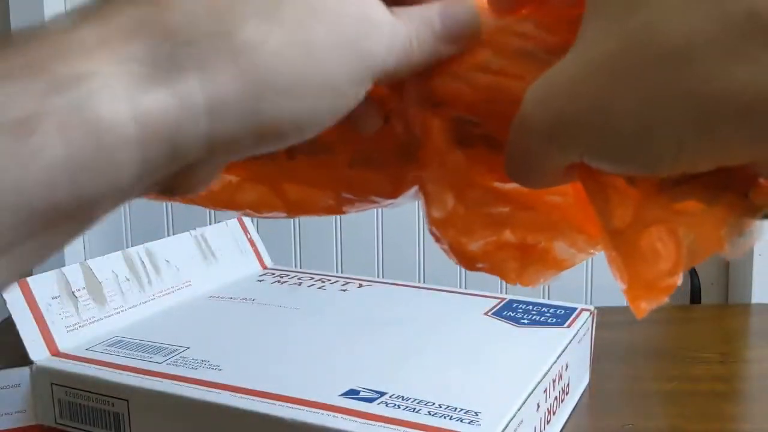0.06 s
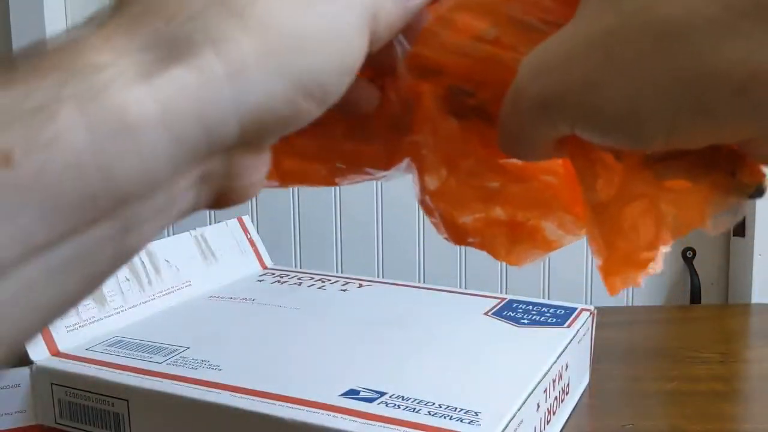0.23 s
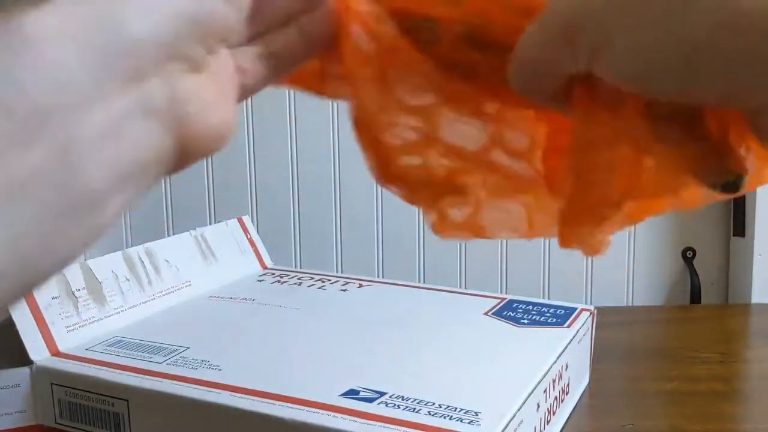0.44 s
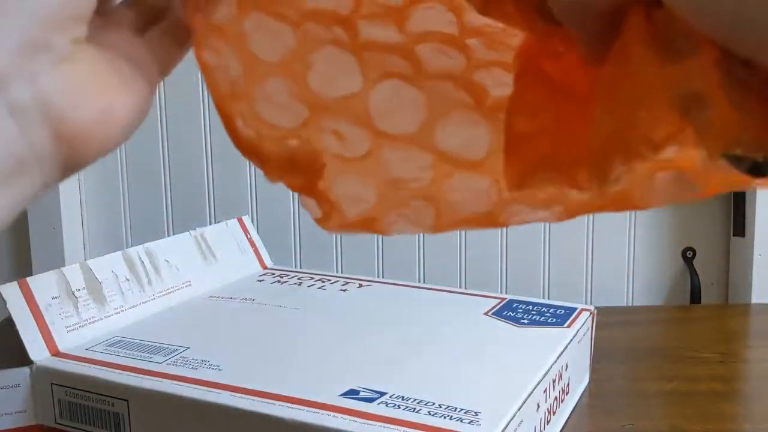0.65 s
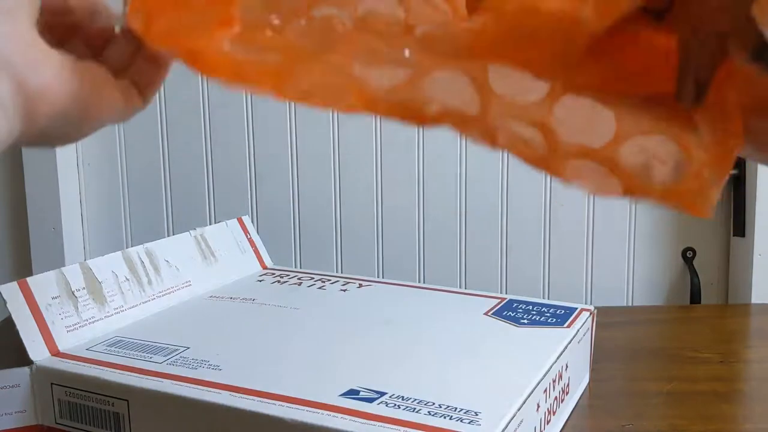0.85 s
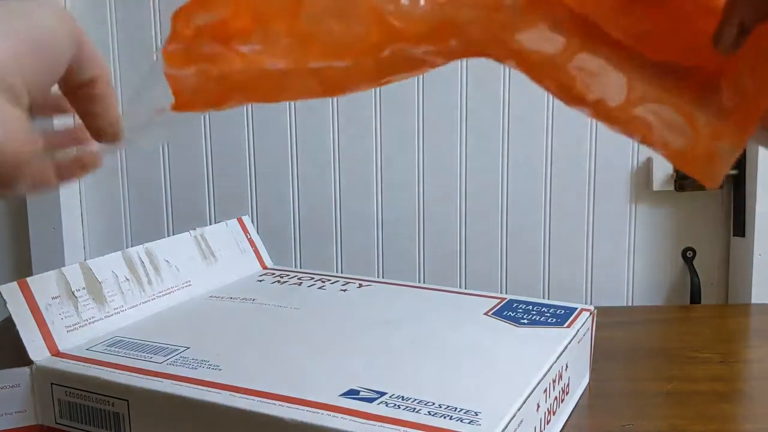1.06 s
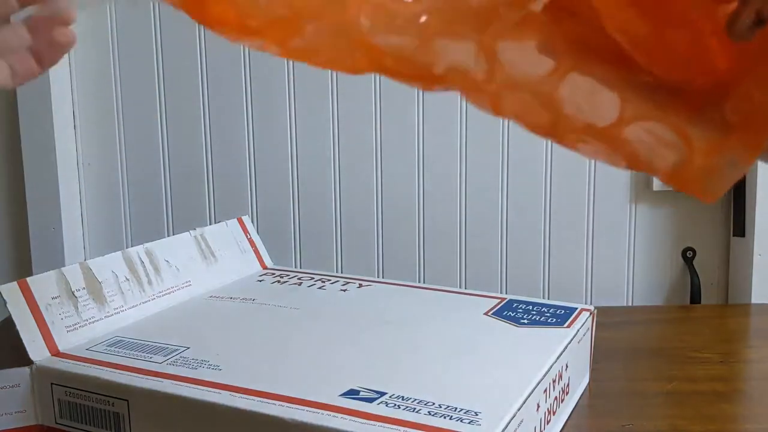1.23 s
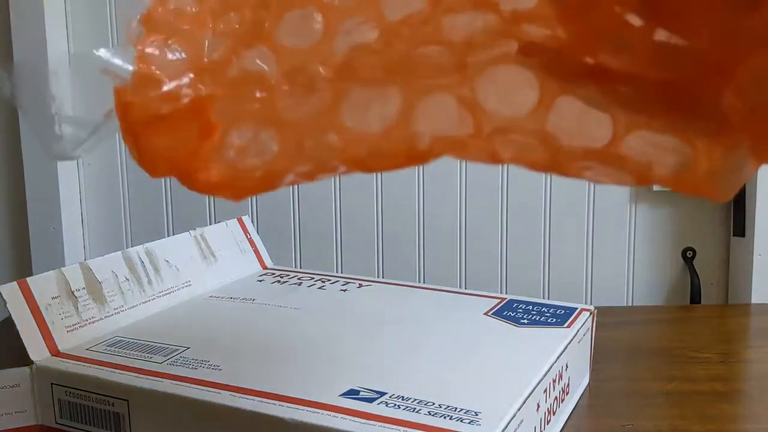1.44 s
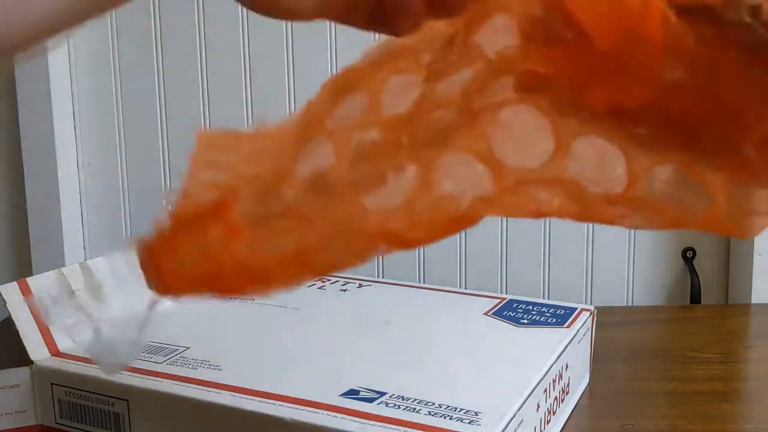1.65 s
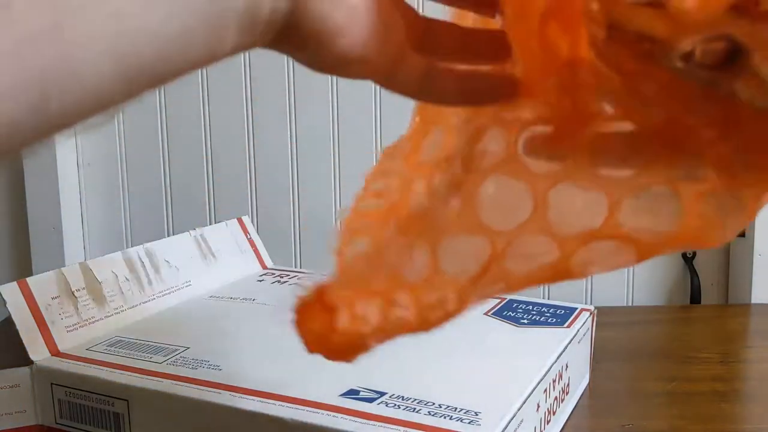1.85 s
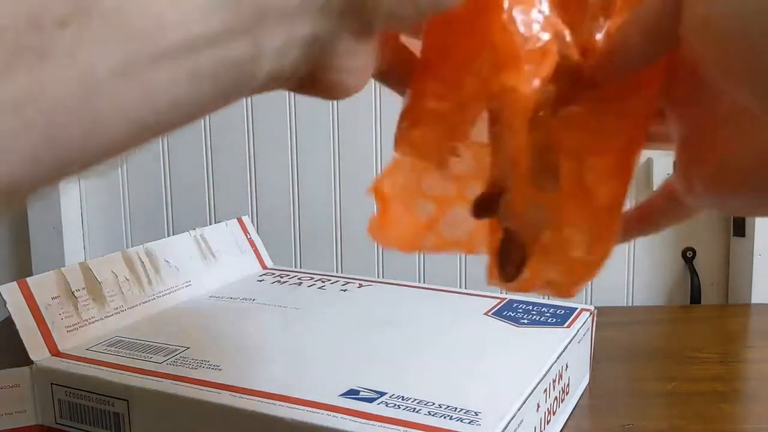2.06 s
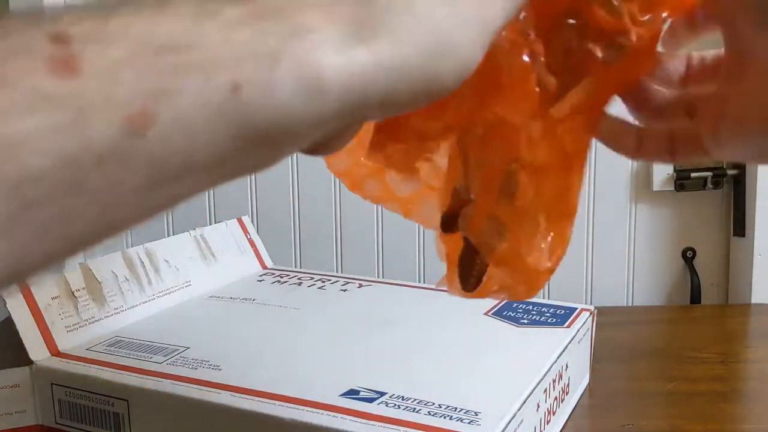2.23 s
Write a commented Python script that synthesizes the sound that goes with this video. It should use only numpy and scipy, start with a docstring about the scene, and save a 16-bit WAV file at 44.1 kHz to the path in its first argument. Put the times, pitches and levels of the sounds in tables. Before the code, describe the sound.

Bubble wrap being handled: bright snaps, a dense crinkling tug, then loose rustling and light taps

```python
"""Bubble wrap snaps as hands grip it, drags free in one dense, bright crackle, then rustles as it is lifted.
Fingers tap and rub the air cells and the loose sheet flaps now and then, close up in a small room.
Snaps, creases, taps and crackles are buckling facets: noise bursts with a spike, scattered and coloured.
Flaps are damped sines; all the handling has a decaying noise tail as its room, over quiet noise."""
import sys
import numpy as np
from scipy import signal
from scipy.fft import rfft, irfft, next_fast_len
from scipy.io import wavfile
from scipy.ndimage import map_coordinates

SR = 44100
rng = np.random.default_rng(int(sys.argv[2]) if len(sys.argv) > 2 else 0)


def digitize_waveform(pressure):
    """Quantize a signal to 16-bit integers and store it at the path in sys.argv[1].

    Rows of a 2-D input are taken as channels; values are limited to [-1, 1].
    """
    field = np.atleast_2d(pressure).T
    bounded = np.clip(field, -1, 1)
    quanta = np.round(bounded * 32767).astype(np.int16)
    wavfile.write(sys.argv[1], SR, quanta)


N = 101429

ONSET_S = .002  # a flip's swell runs this long before its sharpest crack
HALVES = np.array([[.5], [-.5]])  # splits a left-right difference between the ports

# spectrum of taut film: (frequency [Hz], level [dB])
TAUT_FILM_COLOUR = [(100, -22.5), (300, -16.5), (900, -3), (1700, 0), (3200, -1), (4500, -2), (6000, 1),
                    (7400, -3.5), (10500, 2), (13000, -1.5), (16000, -3.5)]
# spectrum of an air cell pitched at 840 Hz: (frequency [Hz], level [dB])
AIR_CELL_COLOUR = [(80, -23.5), (520, -6.5), (840, 2), (1100, -1), (1700, -5.5), (2600, -10), (9000, -35)]


def amp(db):
    """Decibels to gain."""
    return 10 ** (np.asarray(db) / 20)


def unit(x):
    """Scaled to rms 1."""
    return x / np.sqrt(np.mean(x ** 2) + 1e-20)


def along(points, hz):
    """(Hz, value) points interpolated on a log frequency axis."""
    f, v = np.transpose(points)
    return np.interp(np.log(hz + 1), np.log(f + 1), v)


def curve(rows):
    """One value per sample from (s, value) rows."""
    return np.interp(np.arange(N) / SR, *np.transpose(rows))


def filtered(x, response):
    """x times a response of frequency, zero phase."""
    size = next_fast_len(N + SR // 2)
    hz = np.fft.rfftfreq(size, 1 / SR)
    return irfft(rfft(x, size) * response(hz), size)[..., :N]


def coloured(x, points, size=4096):
    """x through a minimum-phase filter of unit energy, made by folding the cepstrum."""
    hz = np.fft.rfftfreq(size, 1 / SR)
    cepstrum = irfft(np.log(amp(along(points, hz))))
    cepstrum[1:size // 2] *= 2
    cepstrum[size // 2 + 1:] = 0
    impulse = irfft(np.exp(rfft(cepstrum)))
    return signal.fftconvolve(x, impulse[None] / np.linalg.norm(impulse), axes=1)[:, :N]


def struck(sound, colour):
    """A single flip given its colour; energy 1 per port on average."""
    x = coloured(sound, colour)
    return unit(x) / np.sqrt(x.shape[1])


def add(track, s, sound):
    """Mix a sound in at time s."""
    i = max(0, round(s * SR))
    part = track[:, i:i + sound.shape[1]]
    part += sound[:, :part.shape[1]]


def buckle(decay_s, spike, scatter, lead_ms, uneven_db, size=1024):
    """One facet of film flips: swell, spike and brief ring with random resonances, scattered by folds."""
    swell_s, lead_jitter_ms = .00048, .053
    t = np.arange(size) / SR - ONSET_S
    hz = np.fft.rfftfreq(size, 1 / SR)
    shape = np.exp(np.minimum(t / swell_s, -t / decay_s))
    ring = unit(rng.standard_normal(size) * shape)
    crack = rng.choice([-1, 1]) * unit(1. * (shape == shape.max()))
    direct = unit(ring + spike * crack)

    # independent per port, twice as long, stronger with frequency
    fold_shape = np.exp(np.minimum(t / swell_s, -t / (2 * decay_s)))
    folds = unit(rng.standard_normal((2, size)) * fold_shape)
    spread = scatter * hz / (hz + 700)

    bumps = map_coordinates(rng.standard_normal(size // 16), [np.sqrt(hz / 45)])
    resonances = amp(uneven_db * bumps)
    lead_s = (lead_ms + rng.normal(0, lead_jitter_ms)) / 1000  # positive: left first
    delay = np.exp(2j * np.pi * hz * HALVES * lead_s)
    spectrum = (rfft(direct) + spread * rfft(folds)) * resonances * delay
    return unit(irfft(spectrum)) / np.sqrt(size)


def crackle(rate, spread_db, decay_s, scatter, uneven_db, count=20):
    """Facets of count kinds flip at random moments, rate a second in all; rms 1."""
    out = np.zeros((2, N))
    for _ in range(count):
        sizes = amp(spread_db * np.clip(rng.standard_normal(N), -2, 2))
        signs = np.sign(rng.standard_normal(N))
        flips = sizes * signs * (rng.random(N) < rate / count / SR)
        facet = buckle(decay_s, spike=.82, scatter=scatter, lead_ms=.016, uneven_db=uneven_db)
        out += signal.oaconvolve(flips[None], facet, axes=1)[:, :N]
    return unit(out)


def room(x, wet_db):
    """Adds the answer of table and panelled walls: a noise tail with its own decay in each band."""
    # decay by 60 dB: (frequency [Hz], time [s])
    t60_s = [(500, 0.2), (4000, 0.19), (16000, 0.088)]
    # left-right correlation of the tail: (frequency [Hz], correlation [-1..1])
    likeness = [(300, 0.67), (700, 0.42), (1500, -0.25), (4000, -0.013)]
    hz, t, z = signal.stft(rng.standard_normal((2, SR // 2)), SR, nperseg=256)
    decay = amp(-60 * t / along(t60_s, hz)[:, None])
    onset = 1 - np.exp(-t / .00043)
    # mid-side balance sets the correlation
    turn = np.arccos(np.clip(along(likeness, hz), -1, 1))[:, None] / 2
    z = z * decay * onset * [np.cos(turn), np.sin(turn)]
    mid, side = signal.istft(z, SR, nperseg=256)[1]
    tail = np.array([mid + side, mid - side])
    return x + amp(wet_db) * signal.fftconvolve(x, tail / np.linalg.norm(tail[0]), axes=1)[:, :N]


def floor():
    """Quiet rumble and hiss of the room: coloured noise, partly shared by the ports."""
    # (frequency [Hz], level [dB])
    floor_colour = [(30, -7.5), (100, -16.5), (300, -27), (2000, -20), (16000, -23.5)]
    noise = rng.standard_normal(N) + rng.standard_normal((2, N))
    return amp(-54) * unit(coloured(noise, floor_colour))


def rustle(count=2):
    """Soft crinkling from several patches of the loose sheet, now brighter, now duller."""
    # slack sheet being moved: (time [s], level [dB])
    motion = [(0, -47), (.14, -88), (.3, -61), (.66, -33), (.73, -41.5), (.8, -50.5), (.88, -50.5),
              (.94, -39.5), (1.02, -44), (1.06, -38), (1.095, -54), (1.17, -48), (1.27, -52.5), (1.33, -45),
              (1.38, -38), (1.49, -41.5), (1.55, -40.5), (1.63, -41.5), (1.72, -55), (1.755, -44),
              (1.83, -40), (1.925, -48.5), (1.965, -39.5), (1.99, -45.5), (2.08, -38.5), (2.17, -38),
              (2.23, -43.5), (2.3, -38.5)]
    # treble gain: (time [s], gain [dB])
    treble_gain = [(.8, 2), (1.0, 1.5), (1.13, 11.5), (1.38, 4.5), (1.77, 0.5), (1.9, 5), (2.3, -2)]
    # (frequency [Hz], level [dB])
    rustle_colour = [(60, -10.5), (220, -9.5), (450, -3), (850, 0.5), (1800, 3), (4200, 1.5), (5500, -3),
                     (7400, -6.5), (9500, -2.5), (12000, -3), (16000, -8)]
    treble_hz = 6000
    out = np.zeros((2, N))
    for _ in range(count):
        grains = crackle(rate=620, spread_db=5.5, decay_s=.0006, scatter=.5, uneven_db=3)
        grains *= amp(curve(motion))
        treble = filtered(grains, lambda hz: hz ** 2 / (hz ** 2 + treble_hz ** 2))
        shaded = grains + (amp(curve(treble_gain)) - 1) * treble
        out += room(coloured(shaded, rustle_colour), wet_db=-2.5)
    return out / np.sqrt(count)


def rubs():
    """Stick and slip of a finger drums softly on the air cells."""
    # strokes: (middle [s], length between 1/e points [s], level [dB])
    rub_strokes = [(0.015, 0.11, -39), (0.197, 0.053, -44)]
    t = np.arange(N) / SR
    strokes = sum(amp(db) * np.exp(-(2 * (t - s) / length) ** 4) for s, length, db in rub_strokes)
    grains = crackle(rate=700, spread_db=2, decay_s=.0034, scatter=1, uneven_db=2)
    return room(coloured(grains * strokes, AIR_CELL_COLOUR), wet_db=-8)


def taps():
    """Hollow pats of fingers on the air cells: the cell spectrum shifts to each pitch."""
    # (time [s], relative level [dB], pitch [Hz])
    tap_events = [(.0225, -33, 940), (0.0758, -31, 960), (.394, -27, 830), (.7145, -28.5, 704),
                  (1.048, -29, 700), (1.162, -34, 1400), (1.44, -29.5, 990), (1.799, -36, 845),
                  (1.954, -33.5, 427), (2.039, -31, 880), (2.048, -30, 820), (2.148, -37.5, 990)]
    gain_db, cell_hz = 19, 840
    out = np.zeros((2, N))
    for s, db, hz in tap_events:
        pat = buckle(decay_s=.003, spike=1.3, scatter=.6, lead_ms=.06, uneven_db=1.2)
        colour = [(f * hz / cell_hz, level) for f, level in AIR_CELL_COLOUR]
        add(out, s - ONSET_S, amp(gain_db + db) * struck(pat, colour))
    return room(out, wet_db=-9.5)


def snaps():
    """Taut film cracks as the grip tightens: single bright flips."""
    # (time [s], relative level [dB], left-right difference [dB])
    snap_events = [(.025, -29.5, 9), (0.078, -23, -0.5), (0.1128, -30, -4), (.179, -28, 2),
                   (0.2164, -17.5, 17), (0.2191, -8.5, -3), (0.2244, -9.5, 0), (0.2319, -17.5, -2),
                   (0.2617, -11.5, 4), (0.284, -15.5, -3.5), (0.3204, -22, 0.5), (0.368, -13.5, 0.5),
                   (0.3936, -9.5, 3.5), (0.4139, -10.5, -4), (0.4203, -9, 9.5), (0.447, -11.5, -1),
                   (0.482, -22, -9), (0.4843, -9, -0.5), (0.4928, -16.5, 12), (0.5248, -17, 14),
                   (0.566, -14, 6), (1.9056, -26, 5)]
    gain_db = 14.5
    out = np.zeros((2, N))
    for s, db, pan_db in snap_events:
        crack = buckle(decay_s=.0009, spike=.5, scatter=.7, lead_ms=.13, uneven_db=1.8)
        port_gain = amp(gain_db + db + HALVES * pan_db)
        add(out, s - ONSET_S, port_gain * struck(crack, TAUT_FILM_COLOUR))
    return room(out, wet_db=-6)


def grip():
    """Film crinkles between tightening fingers: fine bright crackle between the snaps."""
    # (time [s], level [dB])
    grip_level = [(.06, -54), (.078, -46), (.1, -78), (.207, -57), (.222, -25), (.25, -52), (.36, -71),
                  (.385, -35.5), (.42, -24.5), (.472, -30.5), (.5, -22), (.6, -49)]
    grains = crackle(rate=1600, spread_db=5, decay_s=.00096, scatter=.48, uneven_db=1.5)
    return room(coloured(grains * amp(curve(grip_level)), TAUT_FILM_COLOUR), wet_db=-10.5)


def flaps():
    """The sheet pushes the air: one heavily damped low swing each."""
    # (time [s], level [dB], pitch [Hz])
    flap_events = [(0.397, -30.5, 62.5), (0.504, -35, 80), (0.6, -36, 100), (1.058, -35.5, 234),
                   (1.799, -34.5, 192), (1.953, -33, 92), (1.955, -25, 350), (2.147, -27, 230)]
    attack_s, decay_cycles = .0007, .34
    skew_rad_hz = 35  # over pitch: phase of each port; slow swings arrive more out of step
    out = np.zeros((2, N))
    t = np.arange(SR // 8) / SR
    for s, db, hz in flap_events:
        phase = np.array([[1], [-1]]) * skew_rad_hz / hz
        swing = np.sin(2 * np.pi * hz * t + phase)
        envelope = np.exp(-t * hz / decay_cycles) * (1 - np.exp(-t / attack_s))
        add(out, s, amp(db) * swing * envelope)
    return room(out, wet_db=-19)


def pull():
    """Film sticks and slips off the object over a fine crackle of folds; faster slips are smaller."""
    # taut film dragged off: (time [s], level [dB])
    drag = [(.45, -49), (.497, -28), (.595, -18.5), (.638, -21), (.652, -34), (.7, -46), (.83, -82)]
    # (time [s], slips per second [1/s])
    slip_rate = [(.51, 187), (.61, 520)]
    # (frequency [Hz], level [dB])
    pull_colour = [(60, -12.5), (200, -15), (450, -2), (800, -1.5), (1300, 6), (2000, 1.5), (2600, 0.5),
                   (5600, 3), (7200, -1.5), (11200, 2), (16000, 1.5)]
    rate = curve(slip_rate)
    slips = np.zeros((2, N))
    for i in np.flatnonzero(np.diff(np.floor(np.cumsum(rate) / SR))):
        crack = buckle(decay_s=.0007, spike=.35, scatter=.8, lead_ms=.02, uneven_db=2.5)
        jitter_s = rng.normal(0, .2) / rate[i]
        add(slips, i / SR + jitter_s, amp(rng.normal(0, 1.5)) * crack / rate[i])
    folds = .85 * crackle(rate=3500, spread_db=3, decay_s=.0007, scatter=.8, uneven_db=3)
    level = amp(curve(drag))
    return sum(room(coloured(part * level, pull_colour), wet_db=-2.5) for part in (unit(slips), folds))


def ticks():
    """Slack creases fold over one by one: single duller flips."""
    # (time [s], relative level [dB])
    tick_events = [(0.98, -21.5), (0.9871, -20.5), (1.047, -21.5), (1.1197, -26), (1.1716, -28.5),
                   (1.2145, -26.5), (1.2468, -14), (1.2612, -24.5), (1.2694, -28), (1.2887, -25),
                   (1.2993, -23), (1.523, -18.5), (1.5466, -19.5), (1.549, -20), (1.846, -38),
                   (1.9415, -27.5), (2.006, -23.5), (2.0485, -27), (2.111, -31), (2.158, -22),
                   (2.204, -24.5)]
    # (frequency [Hz], level [dB])
    tick_colour = [(150, -35), (1200, -4), (2800, 4), (4400, 2), (7000, -10.5), (11000, -6.5), (16000, -15)]
    gain_db = 11
    out = np.zeros((2, N))
    for s, db in tick_events:
        crease = buckle(decay_s=.0007, spike=1.2, scatter=.45, lead_ms=.01, uneven_db=1.2)
        add(out, s - ONSET_S, amp(gain_db + db) * struck(crease, tick_colour))
    return room(out, wet_db=-3.5)


def scene():
    """All the handling sounds over the quiet room."""
    handling = rustle() + rubs() + taps() + snaps() + grip() + flaps() + pull() + ticks()
    return floor() + handling


def record(dry):
    """The left port is fuller, the right one brighter; nothing is kept above the band limit."""
    # (frequency [Hz], left-right difference [dB])
    port_balance = [(250, 2.5), (550, 1.5), (1200, 1.5), (4000, 1), (6000, 1), (9000, 1), (11000, -5.5),
                    (15500, -7.5)]
    top_hz, slope_hz = 15900, 400

    def response(hz):
        band = np.clip((top_hz - hz) / slope_hz + .5, 0, 1)
        return amp(HALVES * along(port_balance, hz)) * band

    return filtered(dry, response)


dry = scene()
out = record(dry)
digitize_waveform(out)
```